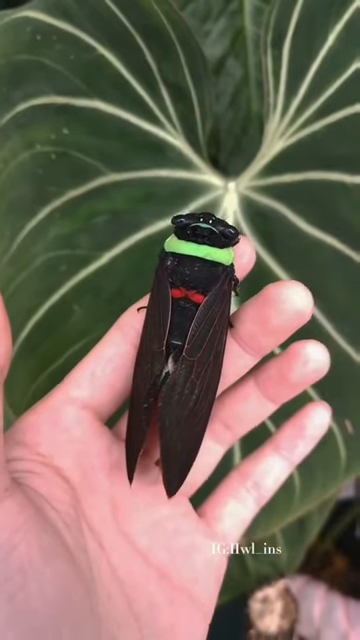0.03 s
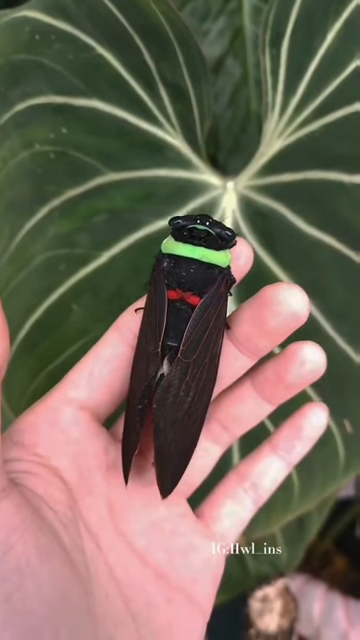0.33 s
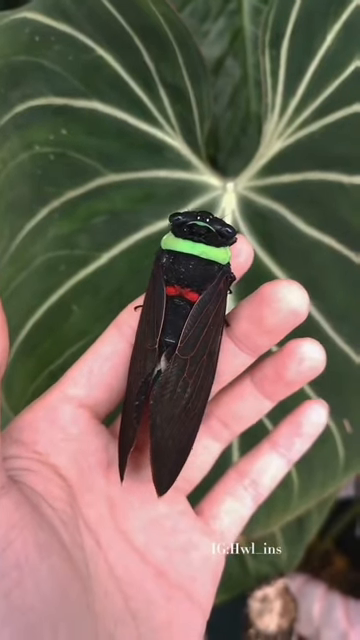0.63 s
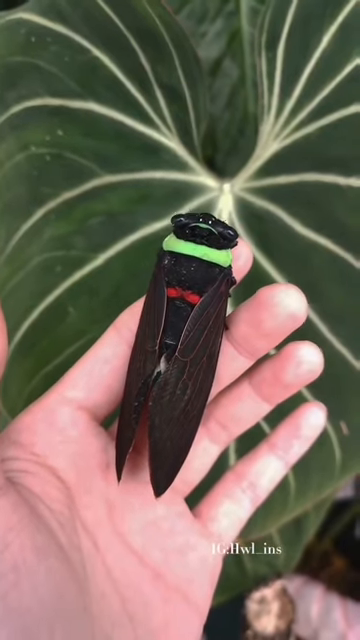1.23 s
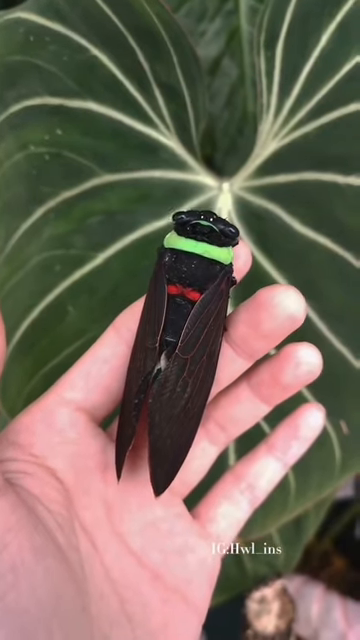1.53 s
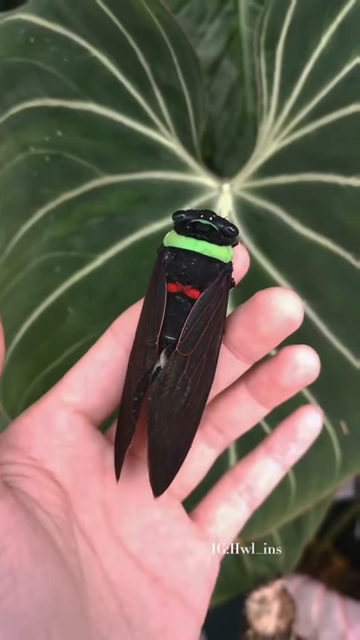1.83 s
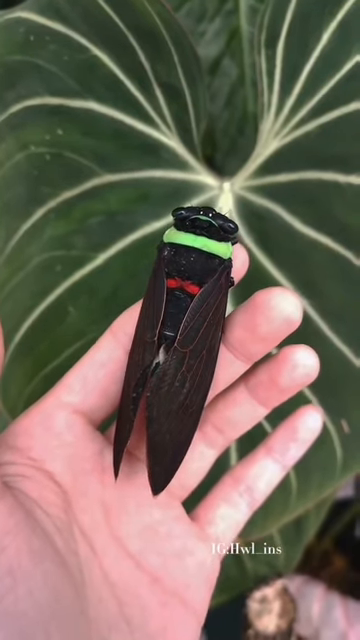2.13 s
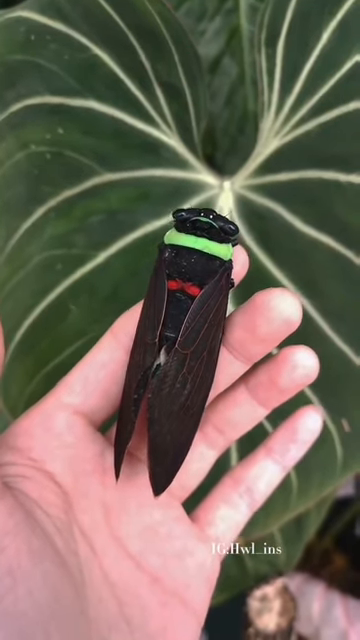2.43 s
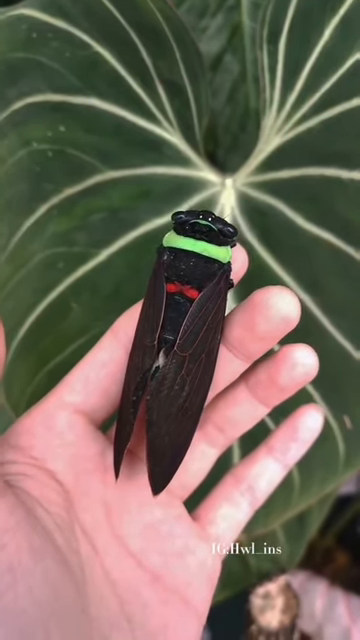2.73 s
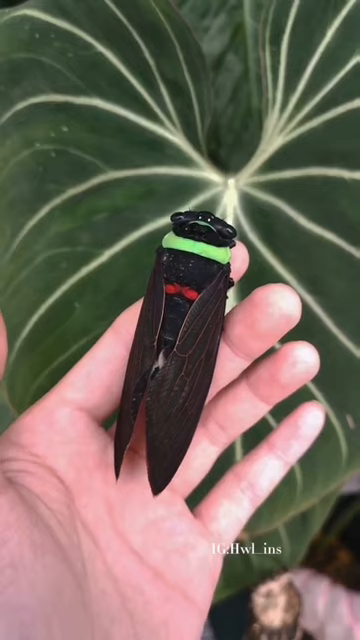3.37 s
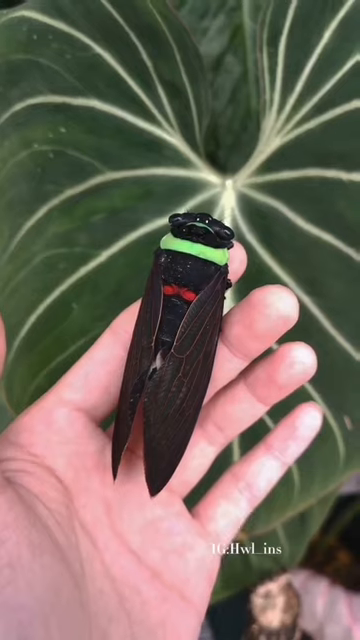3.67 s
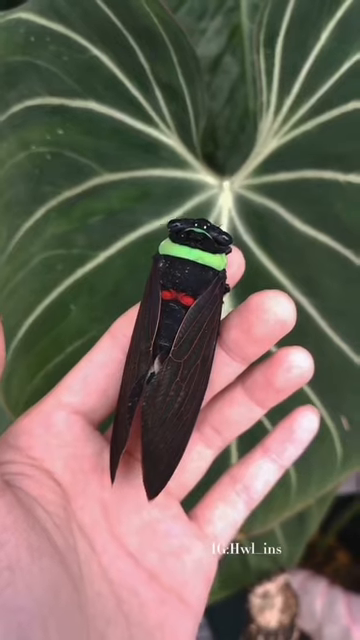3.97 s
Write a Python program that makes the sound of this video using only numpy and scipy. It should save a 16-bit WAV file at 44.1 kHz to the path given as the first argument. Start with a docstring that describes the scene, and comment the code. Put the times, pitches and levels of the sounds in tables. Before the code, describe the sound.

A large cicada screeches close to the microphone outdoors. Its loud, raspy buzz never breaks, swinging from thin and bright to fuller and lower three or four times a second, with a fast, jerky flutter.

```python
"""Outdoors, held close in the hand, a large cicada screeches without a break.
Its tymbals buckle about 181 times a second, an impulse train that rings the modes of the hollow abdomen.
Some 3.5 times a second the abdomen swells and the thin, bright buzz turns full and lower; a fast tremor
shakes the timing and throws in louder jolts. Hand and leaf reflect the snaps, and a faint, distant
rumble lies far below."""
import sys
import numpy as np
from scipy import signal
from scipy.fft import rfft, irfft
from scipy.io import wavfile
from scipy.ndimage import uniform_filter1d

SR = 44100
rng = np.random.default_rng(int(sys.argv[2]) if len(sys.argv) > 2 else 0)


def output_pcm(signal):
    """Save a mono or channel-first signal as 16-bit PCM at the path in sys.argv[1].

    Samples are clipped to [-1, 1] before scaling.
    """
    pcm = np.clip(np.atleast_2d(signal).T, -1, 1) * 32767
    wavfile.write(sys.argv[1], SR, np.round(pcm).astype(np.int16))


N = 176400


# Swells of the abdomen. Each row: start in seconds, end in seconds.
SWELLS = [(.02, 0.088), (0.252, 0.36), (0.509, 0.62), (.82, 0.91), (1.099, 1.21), (1.349, 1.46),
          (1.661, 1.797), (1.958, 2.11), (2.24, 2.335), (2.491, 2.62), (2.81, 2.95), (3.082, 3.19),
          (3.408, 3.535), (3.669, 3.78), (3.912, 3.98)]
# Jolts, brief runs of harder snaps. Each row: time in seconds, relative strength.
JOLTS = [(0.028, 3.5), (.084, 2.5), (.129, 2), (.195, 3), (.328, 0.5), (.428, 3), (0.563, 9.5),
         (0.598, 6.5), (.699, 3), (.741, 5.5), (0.838, 4.5), (.87, 3.5), (1.038, 4.5), (1.144, 1),
         (1.177, 2), (1.251, 2.5), (1.29, 5), (1.321, 5.5), (1.362, 2.5), (1.396, 8), (1.429, 8),
         (1.521, 2.5), (1.71, 5), (1.751, 5.5), (1.898, 3.5), (2.028, 3), (2.073, 0), (2.108, -3.5),
         (2.202, 7.5), (2.274, 9), (2.31, 5), (2.483, 3), (2.548, 8), (2.582, 1), (2.68, 2), (2.747, 11.5),
         (2.842, 6.5), (2.915, 9.5), (3.076, 9), (3.119, 5), (3.161, 7), (3.193, 6), (3.299, 4), (3.344, 3),
         (3.469, 5.5), (3.505, 1.5), (3.607, 5), (3.681, 12), (3.725, 5.5), (3.754, 3.5), (3.893, 3),
         (3.924, 6), (3.96, 12.5)]
def tymbals(first_s=.00783, snap_hz=180.958, rise_hz_per_s=.116, tremor_hz=29, jolt_width_s=.0027):
    """Periodic buckling: each snap's steady beat, shaken time, size and opening (0 tight, 1 open)."""
    elapsed = np.arange(int((N / SR - first_s) * snap_hz) + 2) / snap_hz
    beat = first_s + elapsed - rise_hz_per_s * elapsed ** 2 / snap_hz / 2
    beat = beat[beat < N / SR]
    opening_noise, scatter_db, jitter = rng.standard_normal((len(beat), 3)).T
    swell = sum((1 + np.tanh((beat - start) / .04)) * (1 - np.tanh((beat - end) / .0146)) / 4
                for start, end in SWELLS)
    jolt = sum(strength * np.exp(-.5 * ((beat - s) / jolt_width_s) ** 2) for s, strength in JOLTS)
    jolt_times = np.array(JOLTS)[:, 0]  # whole tremor cycles lie between jolts
    cycles = np.cumsum(np.maximum(np.round(np.diff(jolt_times, prepend=0) * tremor_hz), 1))
    tremor = np.sin(2 * np.pi * np.interp(beat, jolt_times, cycles))
    times = beat - 3.6e-5 * tremor - 4e-5 * (swell - .5) + 6e-6 * jitter
    size = undb(.5 + (.29 + .35 * swell) * jolt + scatter_db)
    opening = np.clip(.91 * swell + .2551 * jolt + .081 * opening_noise, 0, 1)
    return beat, times, size, opening


# Snap spectra, abdomen tight and open. Each row: frequency in Hz, gain in dB.
SNAP_TIGHT = [(500, -70), (900, -27), (1450, -8.5), (2000, -13), (2500, -3.5), (3200, 4.5), (4200, 9),
              (5000, 5.5), (5600, -14), (6600, -10.5), (7600, -14), (9300, -27.5), (14500, -44)]
SNAP_OPEN = [(500, -46), (900, -26.5), (1450, -13.5), (2000, -1.5), (2500, 8), (3200, 9.5), (4200, 8),
             (5000, -18), (5600, -9.5), (6600, -17), (7600, -15.5), (9300, -43), (14500, -72)]
# Modes of the abdomen. Each row: frequency in Hz, width per filter stage in Hz,
# drive when tight in dB, drive when open in dB, left minus right in dB.
ABDOMEN_MODES = [(1689.6, 162, 5, -10.5, 4), (1822, 126, -2, -3.5, 5), (2122, 239, -11.5, 8.5, -2.5),
                 (2340, 370, -36, 3.5, 9.5), (2926, 261, -2.5, 7.5, -14.5), (3240, 450, -2.5, 8, 2),
                 (3883, 224, 8, 6.5, 15), (4380, 278, 10.5, 0, -8.5), (4687, 380, 1.5, -7.5, -17.5),
                 (5132, 170, 3.5, -25, 5.5), (6672, 334, -2.5, 7.5, -2), (7155, 620, -12.5, -13, 19.5),
                 (8420, 320, -16, -39, -11)]
def abdomen(times, size, opening, lead_s=.0005544, lead_db=-13.5, ring_lag_s=2e-5, scatter_db=2.5):
    """Impulse excitation: each snap is a click, then resonances that bloom and fade in milliseconds."""
    out = pulses(times, size * (1 - opening)) * colour(SNAP_TIGHT)
    out += pulses(times, size * opening) * colour(SNAP_OPEN)
    out *= 1 + undb(lead_db) * delay(-lead_s)  # the first rib gives way softly before the main snap
    arrival = np.array([delay(ring_lag_s / 2), delay(-ring_lag_s / 2)])
    for hz, width, tight_db, open_db, pan_db in ABDOMEN_MODES:
        drive = size * ((1 - opening) * undb(tight_db) + opening * undb(open_db))
        drive *= undb(scatter_db * rng.standard_normal(len(times)))
        ring = pulses(times, drive) * resonance(hz, width) ** 2
        out = out + ring * arrival * undb([[pan_db / 2], [-pan_db / 2]])
    return out * (1 - 2 * resonance(hz=3070, width=3900))  # all-pass: the shell smears each snap


# Spectrum of the tick that starts each buckling. Each row: frequency in Hz, gain in dB.
TICK_SPECTRUM = [(4000, -67), (5700, -8), (6300, -57), (7300, -21.5), (8400, -18), (9300, -39),
                 (10000, -20.5), (11000, -21), (11900, -47), (12900, -28.5), (13700, -37.5), (14800, -42)]
def ticks(beat, jitter_s=3e-6, scatter_db=2):
    """Periodicity gives a line spectrum: tiny clicks in near-strict time draw clean treble harmonics."""
    late, strong = rng.standard_normal((len(beat), 2)).T
    return pulses(beat + jitter_s * late, undb(scatter_db * strong)) * colour(TICK_SPECTRUM)


# Spectrum of the buckling ribs' rasp. Each row: frequency in Hz, gain in dB.
RASP_SPECTRUM = [(1300, -34), (1700, -9), (2200, -5), (3300, -7), (4500, -6), (5600, -10), (6700, -2.5),
                 (8200, -15), (9500, -19.5), (11000, -27), (12200, -38), (13300, -26), (14800, -45)]
def rasp(times, size, decay_s=.0071, snap_hz=180.958):
    """Amplitude-modulated noise: an exponentially decaying burst follows every snap."""
    now = np.arange(N) / SR
    last = np.maximum(np.searchsorted(times, now) - 1, 0)
    bursts = size[last] * np.exp(-abs(now - times[last]) / decay_s)
    envelope = level(bursts, 0) * np.sqrt(snap_hz / SR)  # unit energy per average snap
    mid, side = rng.standard_normal((2, N)) * envelope
    return rfft(stereo(mid, .27 * side)) * colour(RASP_SPECTRUM)


# Echoes from hand and leaf. Each row: delay in seconds, mid gain, side gain in the treble.
ECHOES = [(0.000916, 0.19, 0.024), (0.00163, 0.044, 0.036), (0.000551, 0, -0.21), (.00276, 0.037, .04),
          (.00459, 0, 0.18)]
def reflections(body, split_hz=2480):
    """Comb filtering: the direct sound interferes with its own delayed copies."""
    treble = 1 - 1 / (1 + (freqs() / split_hz) ** 10)
    return body * (1 + sum(delay(s) * stereo(mid, side * treble) for s, mid, side in ECHOES))


# Spectrum of the scatter from the surroundings. Each row: frequency in Hz, gain in dB.
SCATTER_SPECTRUM = [(1500, -92), (2000, -27.5), (2600, 8), (3300, -21), (4300, -13), (5200, -2),
                    (6700, -5.5), (8500, 17.5), (10000, -2), (13000, 2)]
def scattering(body, decay_s=.023, mid_db=-5):
    """Diffuse reflection: many paths merge into a short noisy tail, unlike at left and right."""
    tails = rng.standard_normal((2, N)) * np.exp(-np.arange(N) / SR / decay_s)
    mid, side = rfft(tails / np.sqrt(np.sum(tails ** 2, axis=1, keepdims=True)))
    return body.mean(axis=0) * colour(SCATTER_SPECTRUM) * stereo(undb(mid_db) * mid, side)


# Dips in the radiated sound. Each row: frequency in Hz, width in Hz, share of amplitude removed.
NOTCHES = [(3647, 100, 0.66), (5415, 350, 1), (6190, 210, 0.5), (8513, 350, 1), (1387, 163, 0.75)]
# Stereo balance of the cicada. Each row: frequency in Hz, left minus right in dB.
BALANCE = [(1500, -0.5), (2400, -3), (3300, 0), (5000, -0.5), (6700, -6), (8200, 2), (10000, 1),
           (13000, -5)]
def cicada(rasp_open_db=1.5):
    """Superposition: the spectra of snaps, echoes and rasp add, and are notched and panned as one."""
    beat, times, size, opening = tymbals()
    body = abdomen(times, size, opening) + ticks(beat)
    out = reflections(body) + scattering(body) + rasp(times, size * undb(rasp_open_db * opening))
    for hz, width, share in NOTCHES:
        out *= 1 - share * resonance(hz, width)
    return irfft(out * colour(BALANCE) ** np.array([[.5], [-.5]]), N)


# Spectrum of the distant rumble. Each row: frequency in Hz, relative level in dB.
RUMBLE_SPECTRUM = [(15, -31), (25, -1), (108, -2), (140, -4), (178, 1), (261, -8), (451, -2.5), (515, -6),
                   (850, -8.5), (1100, -15), (1870, -120)]
# Drift of the background. Each row: time in seconds, bass gain in dB, low-middle gain in dB.
BACKGROUND_GAINS = [(0.0, -75, -71), (0.05, -77, -73), (0.89, -75, -62), (1.0, -66, -68),
                    (1.11, -73, -65.5), (1.14, -66, -64), (1.51, -74, -68.5), (1.6, -71, -64.5),
                    (2.19, -74, -67.5), (2.86, -65.5, -66), (3.2, -74, -62.5), (3.9, -71, -67)]
def outdoors(split_hz=170, side_gain=.14, waver_db=1.5):
    """Band-limited noise: a distant rumble, a dull wash above it and a faint wavering drone."""
    times, bass_db, middle_db = np.array(BACKGROUND_GAINS).T
    bass, middle = (undb(np.interp(np.arange(N) / SR, times, db)) for db in (bass_db, middle_db))
    mid, side, noise = rfft(rng.standard_normal((3, N)))
    low = 1 / (1 + (freqs() / split_hz) ** 4)
    rumble = irfft(stereo(mid, side_gain * side) * colour(RUMBLE_SPECTRUM) * low, N)
    wash = irfft(stereo(mid, side_gain * side / 2) * colour(RUMBLE_SPECTRUM) * (1 - low), N)
    drone = irfft(noise * resonance(hz=430, width=89) ** 2, N) * undb(waver_db * walk(rate_hz=6.03))
    return bass * level(rumble, db=.5) + middle * (level(wash, db=-1) + level(drone, db=-6))


def undb(db):
    """Amplitude ratio from decibels."""
    return 10 ** (np.asarray(db) / 20)


def freqs():
    """Frequency axis of a whole-length spectrum, in Hz."""
    return np.maximum(np.arange(N // 2 + 1) * SR / N, 1)


def colour(points):
    """Gain per frequency from (Hz, dB) points."""
    hz, db = np.array(points).T
    return undb(np.interp(np.log(freqs()), np.log(hz), db))


def resonance(hz, width):
    """Band-pass response of a damped oscillator, gain 1 at the centre."""
    f = freqs()
    return 1 / (1 + 1j * (f * f - hz * hz) / (f * width))


def delay(s):
    """Linear phase of a pure delay."""
    return np.exp(-2j * np.pi * freqs() * s)


def level(x, db):
    """Scaling to an RMS level."""
    return x * undb(db) / np.sqrt(np.mean(x ** 2))


def walk(rate_hz):
    """Smoothed random steps, RMS 1."""
    hold = int(SR / rate_hz)
    steps = np.repeat(rng.standard_normal(N // hold + 1), hold)
    return level(uniform_filter1d(uniform_filter1d(steps, hold), hold)[:N], 0)


def pulses(times, sizes, order=8):
    """Spectrum of a click train, placed between samples by sinc interpolation."""
    taps = np.floor(times * SR).astype(int)[:, None] + np.arange(1 - order, order + 1)
    offset = taps - times[:, None] * SR
    shape = np.sinc(offset) * np.cos(np.pi * offset / order / 2) ** 2
    return rfft(np.bincount(taps.ravel() % N, (sizes[:, None] * shape).ravel(), N))


def stereo(mid, side):
    """Left and right as sum and difference."""
    return np.array([mid + side, mid - side])


def scene():
    """Sound pressures add: the near cicada over the distant background."""
    return cicada() + outdoors()


def record(dry, top_hz=14800):
    """Elliptic low-pass filtering cuts the highest treble."""
    return signal.sosfiltfilt(signal.ellip(8, .1, 60, top_hz, fs=SR, output="sos"), dry)


dry = scene()
out = record(dry)
output_pcm(out)
```